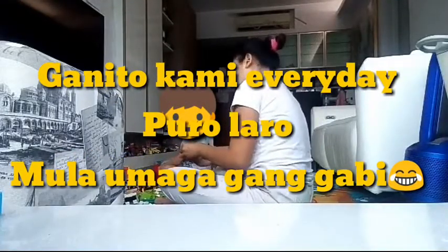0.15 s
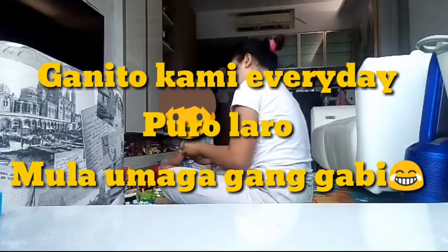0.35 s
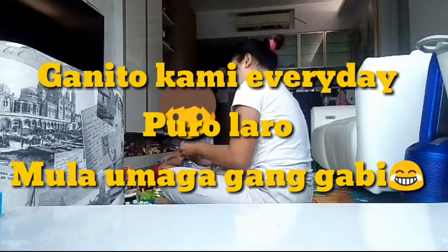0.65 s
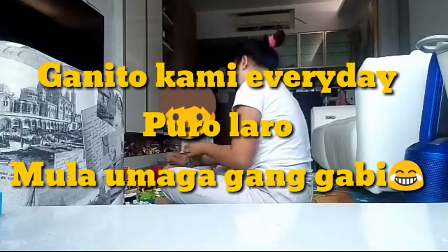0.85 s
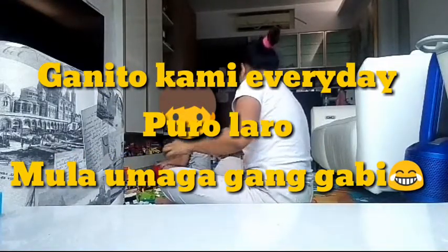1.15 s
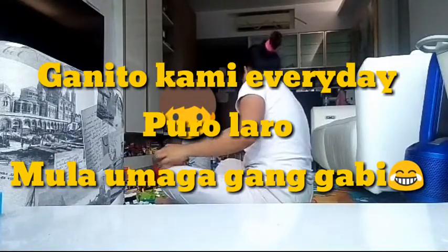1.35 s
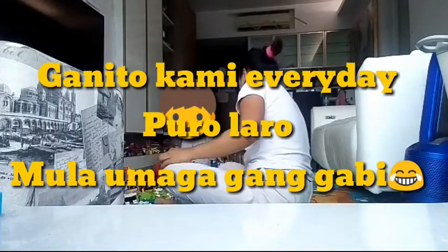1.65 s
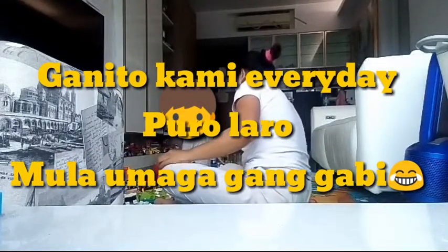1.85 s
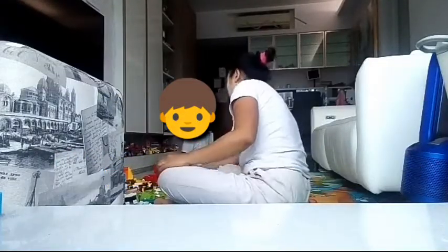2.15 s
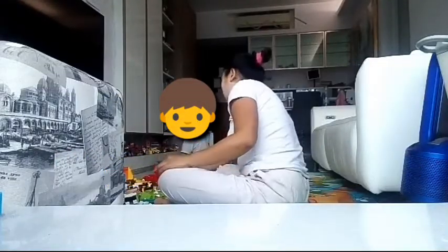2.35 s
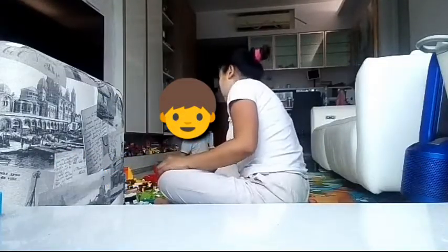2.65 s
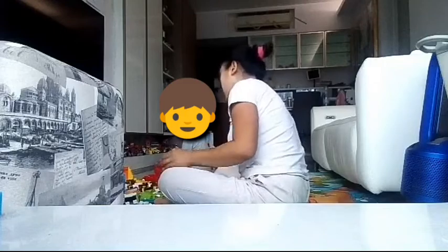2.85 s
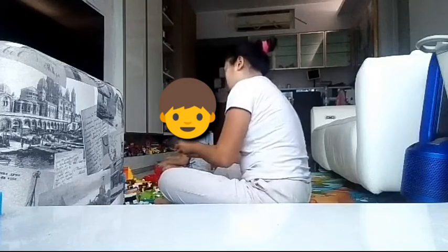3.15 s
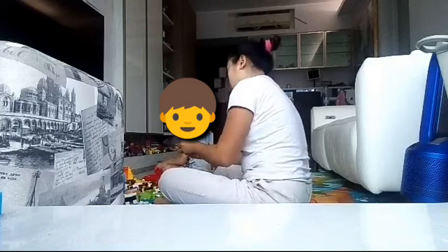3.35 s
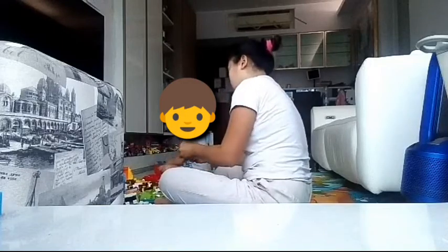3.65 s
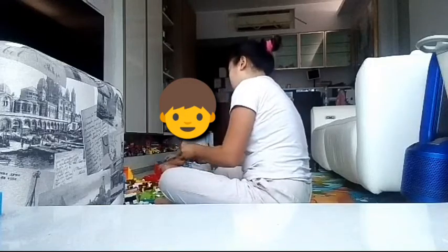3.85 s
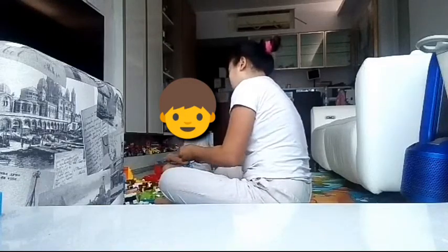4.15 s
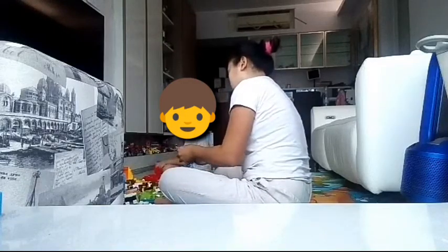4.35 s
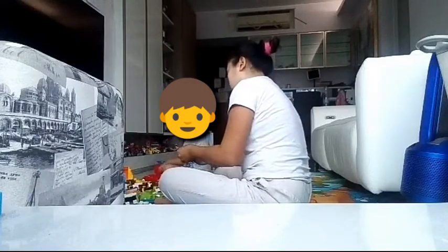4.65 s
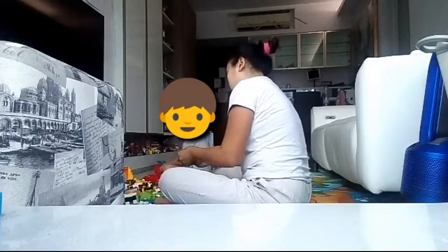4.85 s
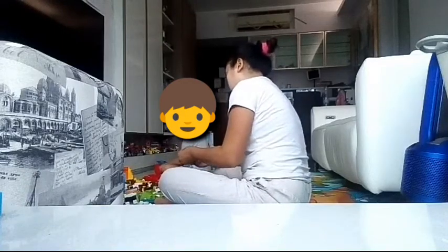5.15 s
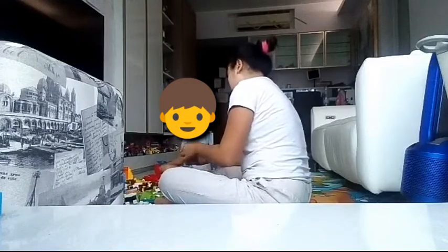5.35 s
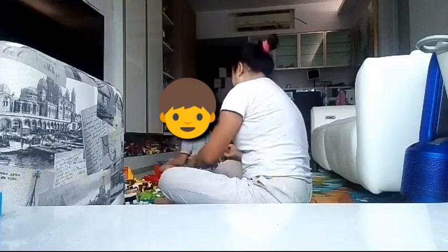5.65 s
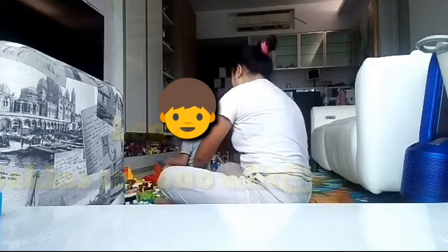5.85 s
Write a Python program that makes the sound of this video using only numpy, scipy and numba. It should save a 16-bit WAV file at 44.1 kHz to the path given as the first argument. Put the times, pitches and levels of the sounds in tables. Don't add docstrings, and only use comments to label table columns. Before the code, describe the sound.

Hands rummage through plastic toy bricks: bright sprays of clicks, hollow knocks and a short rustling push, with gaps over a soft fan hum.

```python
import sys
import numpy as np
from scipy import signal
from scipy.fft import rfft, irfft, next_fast_len
from scipy.io import wavfile
from scipy.ndimage import uniform_filter1d
from numba import njit

SR = 44100
rng = np.random.default_rng(int(sys.argv[2]) if len(sys.argv) > 2 else 0)


def field_ratio(decibels):
    return 10 ** (np.asarray(decibels, dtype=float) / 20)


def generate_wav(sig):
    pcm = np.round(np.clip(np.atleast_2d(sig).T, -1, 1) * 32767).astype(np.int16)
    wavfile.write(sys.argv[1], SR, pcm)


N = 265288

# [f/Hz, level/dB per Hz]
FAN_HUM = [(15, -46), (25, -29), (46, -7.5), (65, -0.5), (151, -6.5), (179, -10.5), (213, -10.5),
           (301, -14), (340, -13.5), (469, -18.5), (504, -15.5), (957, -32), (1250, -23.5), (1820, -48),
           (9000, -60), (11700, -93), (19800, -120)]
# [f/Hz, level/dB, trail/s]
STUD_MODE = (10070, 0, 0.096)
# [f/Hz, level/dB, trail/s]
WALL_MODES = [
    (11630, -8, 0.04),
    (14800, 1, 0.08),
]
# [t/s, stud level/dB, wall level/dB]
TINKLES = [
    (.936, -69, -85),
    (1.258, -50, -52),
    (1.656, -62, -51),
    (2.351, -59, -60),
    (2.55, -66, -55),
    (2.707, -59, -61),
    (3.335, -53.5, -61),
    (4.498, -56, -72),
    (5.094, -70, -56),
    (5.439, -59, -80),
]
# [t/s, level/dB, f/Hz of the centre]
STROKES = [
    [(1.5, -74, 3950), (1.58, -61.5, 4000), (1.64, -59, 2510), (1.66, -79, 2500)],
    [(2.29, -72, 2410), (2.36, -52, 2380), (2.45, -46, 2590), (2.55, -48.5, 3070), (2.63, -52.5, 2430),
     (2.72, -72, 2080)],
    [(5.25, -71, 4460), (5.33, -54, 4400), (5.40, -58, 4440), (5.44, -72, 4510)],
]
# [t/s, peak level/dB, f/Hz]
RINGING_PIECES = [(.575, -52, 3700), (4.124, -52, 3700), (4.921, -51, 3350), (1.276, -53, 5430),
                  (1.647, -24.5, 1262), (1.66, -43, 652), (1.671, -32, 1190), (1.685, -37, 1378),
                  (1.709, -45, 1190), (1.759, -53, 1210), (2.42, -47.5, 664), (2.52, -45.5, 1890),
                  (2.707, -51, 6000), (2.965, -52, 622), (3.13, -49.5, 395), (3.135, -53, 636),
                  (3.33, -46.5, 511), (3.671, -53, 1294), (3.69, -49.5, 1246), (3.708, -49.5, 925),
                  (4.125, -55, 4050), (4.499, -41, 3780), (4.919, -50, 2290), (5.085, -36.5, 1180),
                  (5.092, -39, 1954), (5.095, -39, 752), (5.11, -42, 1190), (5.415, -43, 761),
                  (5.416, -37.5, 1285), (5.453, -36, 1230)]
# [t/s, peak level/dB, f/Hz]
FLAT_TILES = [
    (1.40, -55.5, 3190),
    (2.347, -48, 3100),
    (2.551, -50, 5070),
    (2.708, -60, 3080),
    (2.78, -62, 3140),
    (3.139, -61.5, 4870),
    (5.852, -83, 3700),
]
# [t/s, peak level/dB, f/Hz of the centre, thud/dB, first contact/dB]
BIG_PIECES = [(0.556, -39.5, 1070, 1, -7), (0.934, -44, 1050, -25, -14), (1.254, -45, 990, 2.5, 15.5),
              (1.603, -29.5, 1420, -19, 2), (1.647, -25.5, 1100, -11, 7), (1.668, -22.5, 1340, -44, -2),
              (2.293, -34.5, 910, -1.5, -8), (2.352, -28.5, 930, -2, 6), (2.44, -39.5, 870, -2, 20),
              (2.607, -50.5, 970, -1, 23), (2.68, -34.5, 930, -24, -1), (2.963, -34, 1150, -2.5, -2),
              (3.039, -43, 1190, -10, 15), (3.127, -38.5, 1220, -3.5, 15), (3.323, -41.5, 1043, -4.5, 18.5),
              (3.68, -27.5, 1200, -25, -2), (4.493, -41.5, 750, -17, 3), (5.084, -20, 1200, -17, 3.5),
              (5.415, -24.5, 1220, -16.5, 11.5)]
# [t/s, peak level/dB, f/Hz of the centre, first contact/dB]
SMALL_BRICKS = [(0.4993, -52.5, 6860, -15), (0.5316, -38, 5800, -9), (0.5743, -40.5, 3760, 6),
                (0.9213, -48, 5430, -2), (0.9378, -38.5, 5050, 8.5), (0.9673, -32, 5900, -6),
                (1.2586, -18.5, 5220, 2), (1.3, -20, 5980, -12), (1.6551, -19, 4700, 3),
                (2.3057, -39.5, 7100, -8), (2.3506, -28, 3420, 7), (2.5508, -31.5, 4940, 1),
                (2.7061, -26, 6600, -9), (2.9623, -43, 2240, -7), (3.0512, -53, 3450, 10),
                (3.1269, -35, 2930, 7.5), (3.334, -27.5, 4700, 11.5), (3.3633, -21.5, 4500, -14),
                (3.5184, -37, 4200, 9), (3.687, -40, 5300, 8.5), (4.1246, -50, 4000, -9),
                (4.3605, -59, 2700, -15), (4.4966, -24, 3700, -1), (4.5494, -24, 4700, -12.5),
                (4.8592, -52, 5100, -10), (4.9014, -34, 5170, -14), (4.918, -36, 3200, 2),
                (5.0932, -22, 4300, 8), (5.4229, -26.5, 5640, -11), (5.4698, -24.5, 5000, 1)]
# [f/Hz, level/dB]
MIC_RESPONSE = [(70, -41), (200, -8.5), (400, -2.5), (1200, -5.5), (2000, -9), (4000, 0.5), (6500, 10),
                (7200, 1.5), (8000, -6), (8800, -8), (9500, -29), (15000, -35)]
# [f/Hz, level/dB]
COVERED_PORT = [(60, -20.5), (400, -23), (700, -15.5), (1300, -23.5), (2400, -18), (5500, -17.5),
                (6800, -22.5), (7300, -29), (9000, -30), (10000, -4)]
# [f/Hz, level/dB per Hz]
PORT_HISS = [(300, -29), (2000, 3), (7000, -5), (9000, -11.5), (13600, -9), (14600, -3.5), (15400, -8)]

LEAD_SAMPLES = 41
TOP_HZ = 15500
STROKE_RATE = 100
CLICK_TRAIL_S, TRAIL_S_PER_DB = 0.09, 0.0007
SPREAD_OCT, SPREAD_OCT_PER_DB, SPREAD_PER_OCT = 0.71, 0.012, 0.25
KNOCK_TRAIL_S = 0.038
RING_T60_S, RING_KNEE_HZ = 0.049, 1930
TILE_CYCLES = 99


def colour(x, table):
    hz, db = np.transpose(table)
    n = next_fast_len(x.shape[-1], True)
    f = np.arange(n // 2 + 1) * SR / n + 1
    gain = field_ratio(np.interp(np.log(f), np.log(hz), db))
    return irfft(rfft(x, n) * gain, n)[:x.shape[-1]]


def level(x, db):
    return x * field_ratio(db) / np.sqrt(np.mean(x ** 2))


def fan():
    hold = SR // 6
    steps = np.repeat(rng.standard_normal(N // hold + 1), hold)
    sway = field_ratio(uniform_filter1d(steps, hold)[:N])
    return [level(colour(rng.standard_normal(N), FAN_HUM), -50.0) * sway for _ in range(2)]


def room(t60_low, t60_mid, t60_top, wet_db, build, flutter_db):
    t = np.arange(SR) / SR
    noise = rng.standard_normal(SR)
    low, under_top = (signal.sosfilt(signal.butter(4, hz, fs=SR, output="sos"), noise) for hz in (2400., 7300.))
    bands = zip((low, under_top - low, noise - under_top), (t60_low, t60_mid, t60_top))
    tail = sum(band * field_ratio(-60 * t / t60) for band, t60 in bands)
    throb_db = flutter_db * np.cos(2 * np.pi * t / 0.01223) * np.exp(-t / 0.08)
    direct = t == 0
    return field_ratio(wet_db + throb_db) * tail * (1 - np.exp(-t / build)) + direct


@njit
def ring(start, hz, t60, size, n):
    out = np.zeros(n)
    for k in range(len(start)):
        turn = np.exp(2j * np.pi * hz[k] / SR - np.log(1000.) / (t60[k] * SR))
        z, i = size[k] + 0j, int(start[k] * SR)
        for j in range(i, min(n, i + int(t60[k] * SR))):
            out[j] += z.imag
            z *= turn
    return out


def spray(s, db, hz, spread, trail, first_db, t60, fall_db, scatter_db, count):
    when = rng.random((len(s), count)) * 1.14 - .14
    size = np.minimum(rng.exponential(size=(len(s), count)), 2)
    steps = np.arange(count) * (np.sqrt(5) - 1) / 2
    pitch = 4 * ((steps + rng.random((len(s), 1))) % 1 - .5)
    first = np.arange(count) < count // 12
    tumble = trail[:, None] * when * (.8 + 1.0 * np.abs(when))
    late = np.where(first, .0055 * np.abs(when), tumble)
    f = np.clip(hz[:, None] * 2 ** (spread[:, None] * pitch), 150, .4 * SR)
    swell_db = np.where(when < 0, 140 * when - 3.0, fall_db * when)
    contact_db = np.where(first, first_db[:, None], swell_db + scatter_db * size)
    g = field_ratio(db[:, None] - 2.5 * pitch ** 2 + contact_db)
    return ring((s[:, None] + late).ravel(), f.ravel(), (t60 * 1000 / f).ravel(), g.ravel(), N)


def tinkle():
    s, stud_db, wall_db = np.transpose(TINKLES)
    out, flat = 0, np.ones(len(s))
    for hit_db, (hz, db, trail) in zip((stud_db, wall_db, wall_db), [STUD_MODE] + list(WALL_MODES)):
        out = out + spray(s, hit_db + db - 6.5, hz * flat, 0.01 * flat, trail * flat, 0 * s,
                          0.061, -18.5, 3.73, count=24)
    return colour(out, [(8500, -47.5), (9600, 10.5), (16000, -1.0)])


def plough():
    out = 0
    for stroke in STROKES:
        s, db, hz = np.transpose(stroke)
        at = np.arange(s[0], s[-1], 1 / STROKE_RATE)
        flat = np.ones(len(at))
        out = out + spray(at, np.interp(at, s, db) + 9.5, np.interp(at, s, hz), 1.068 * flat, .012 * flat,
                          0 * flat, 0.02, 0., 3.23, count=11)
    return out


def rings():
    s, db, hz = np.transpose(RINGING_PIECES).copy()
    pieces = ring(s, hz, RING_T60_S / (1 + (hz / RING_KNEE_HZ) ** 2), field_ratio(db + 16.5), N)
    s, db, hz = np.transpose(FLAT_TILES).copy()
    return pieces + ring(s, hz, TILE_CYCLES / hz, field_ratio(db + 17.5), N)


def knocks():
    s, db, hz, thud_db, first_db = np.transpose(BIG_PIECES)
    flat = np.ones(len(s))
    trail = KNOCK_TRAIL_S * flat
    hollow = spray(s, db - 5.5, hz, 0.35 * flat, trail, first_db, 0.0083, -11.0, 5.65, count=36)
    thud = spray(s, db + thud_db - 11.5, 430 * flat, 0.39 * flat, trail, first_db, 0.015, -9.5, 3.9, count=36)
    return hollow + thud


def clicks():
    s, db, hz, first_db = np.transpose(SMALL_BRICKS)
    trail = CLICK_TRAIL_S + TRAIL_S_PER_DB * (db + 35)
    spread = SPREAD_OCT + SPREAD_OCT_PER_DB * first_db + SPREAD_PER_OCT * np.log2(hz / 5000)
    spread = np.clip(spread, .3, 0.88)
    return spray(s, db - 11.0, hz, spread, trail, first_db, 0.015, -16.0, 3.9, count=120)


def scene():
    bricks = colour(clicks() + knocks() + rings() + plough(), MIC_RESPONSE) + tinkle()
    near, other = (signal.fftconvolve(bricks, room(0.46, 0.47, 0.37, -27.0, 0.001, 2.1))[:N] for _ in range(2))
    hum, hum_other = fan()
    own = colour(other + hum_other, [(100, -9), (500, -3), (1000, 0)])
    same = colour(near + hum, [(200, 0), (600, -4), (1200, -16)])
    return np.array([np.roll(near + hum, LEAD_SAMPLES), same + own])


def mask(x, from_hz, quiet_db, under_db, tilt_db, hole_db):
    f, _, z = signal.stft(x, SR, nperseg=2048)
    f = f[:, None]
    loud = np.sqrt(np.mean(np.abs(z[46:325]) ** 2, axis=0))
    shadow = field_ratio(under_db - tilt_db * np.log2(f / from_hz + 1e-9)) * loud
    threshold = np.maximum(field_ratio(quiet_db), shadow) * (f > from_hz) + 1e-12
    over = np.abs(z) / threshold
    band = np.sqrt(np.mean(over[1:].reshape(64, 16, -1) ** 2, axis=1))
    luck = uniform_filter1d(rng.standard_normal(band.shape), size=3, axis=1)
    z[1:] *= np.repeat(band * field_ratio(8 * luck) > field_ratio(hole_db), 16, axis=0)
    gate = over ** 6 / (1 + over ** 6)
    return signal.istft(z * gate * (f < TOP_HZ), SR)[1][:N]


def low_pass(x):
    return signal.sosfilt(signal.butter(12, 16270, fs=SR, output="sos"), x)


def record(dry):
    left = dry[0] + level(colour(rng.standard_normal(N), PORT_HISS), -76.0)
    hiss = colour(colour(rng.standard_normal(N), PORT_HISS), [(2000, -7.0), (13000, 6.5), (15000, 9)])
    right = colour(dry[1], COVERED_PORT) + level(hiss, -77.0)
    left = mask(left, 7700., -113., -31., 11., 4.)
    right = mask(right, 7000., -117., -16., 13., 2.)
    return low_pass(np.array([left, right]))


dry = scene()
out = record(dry)
generate_wav(out)
```